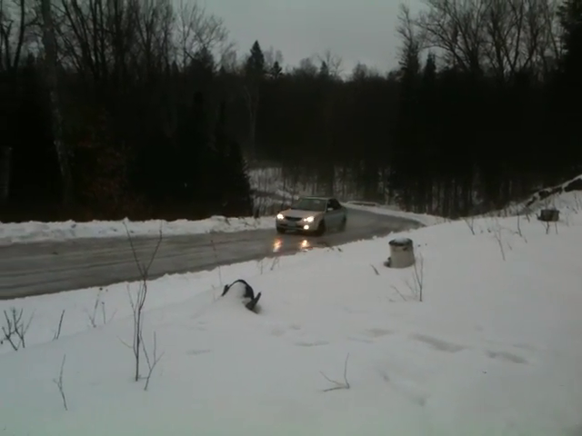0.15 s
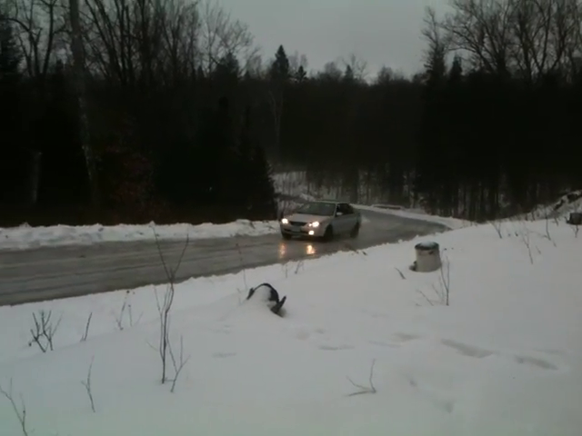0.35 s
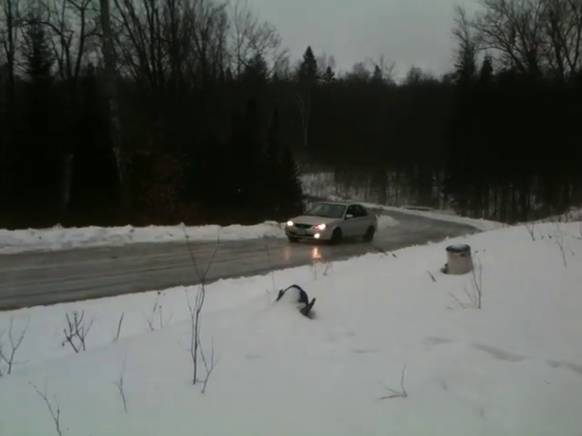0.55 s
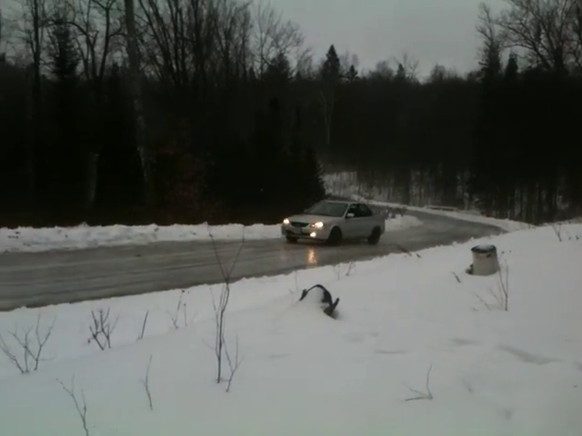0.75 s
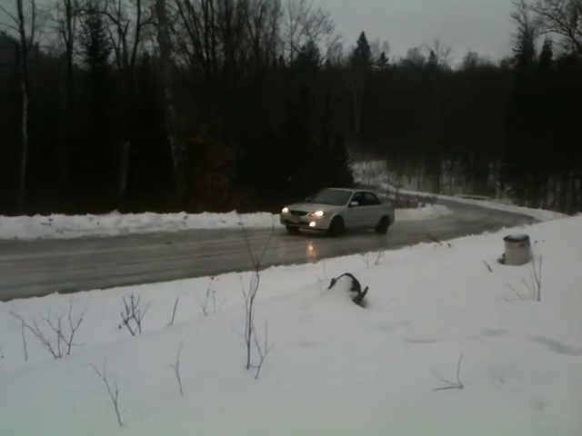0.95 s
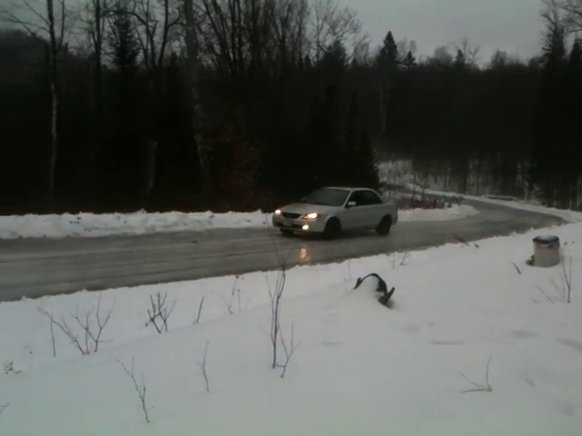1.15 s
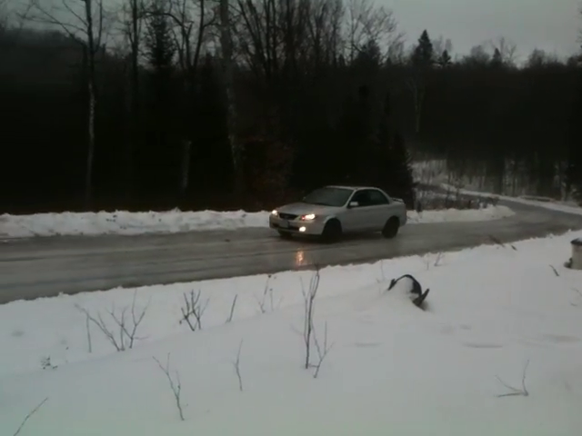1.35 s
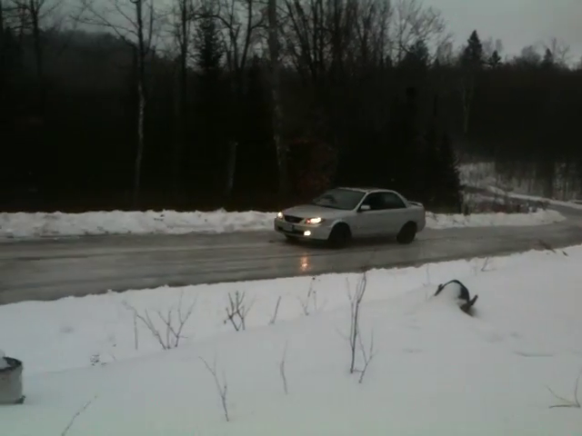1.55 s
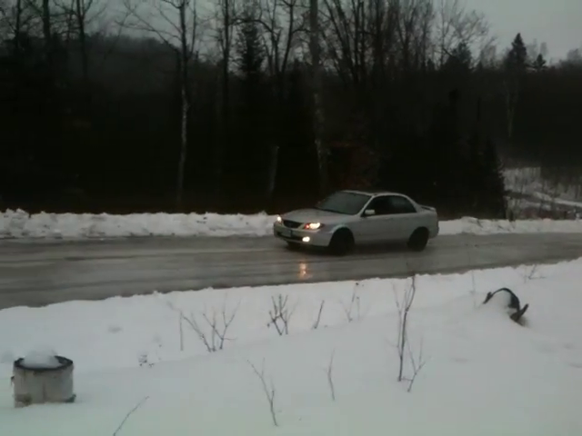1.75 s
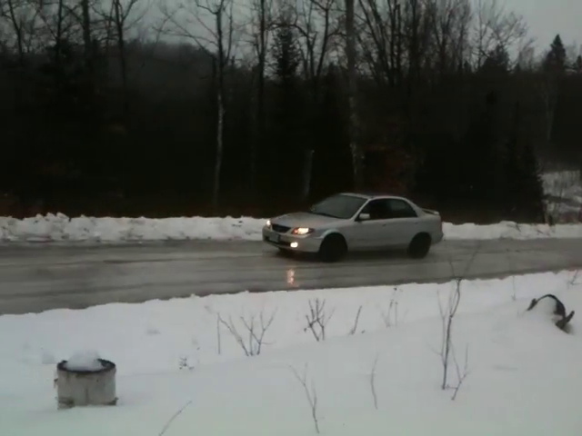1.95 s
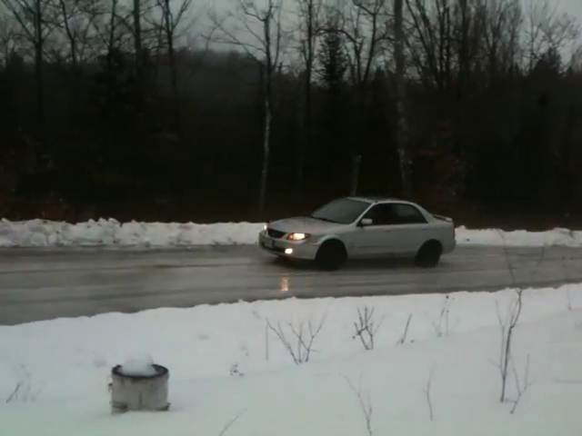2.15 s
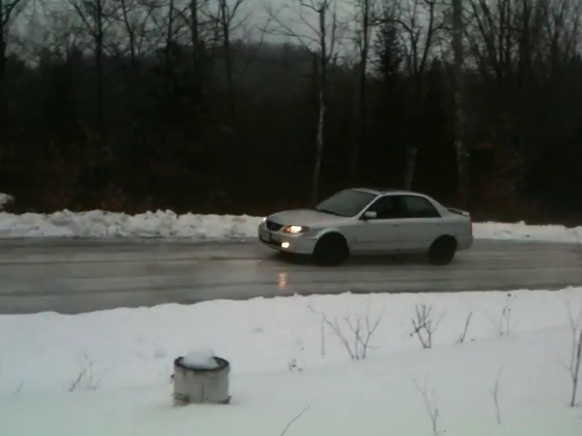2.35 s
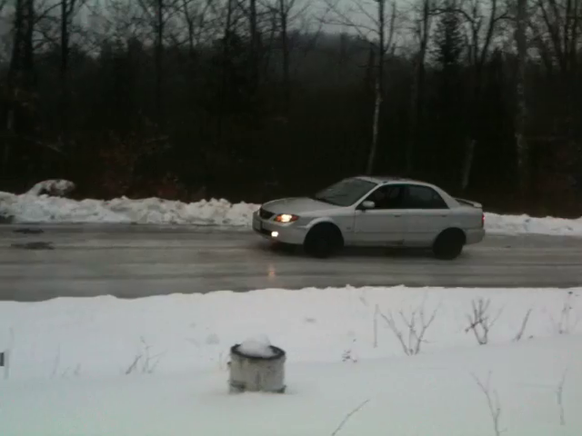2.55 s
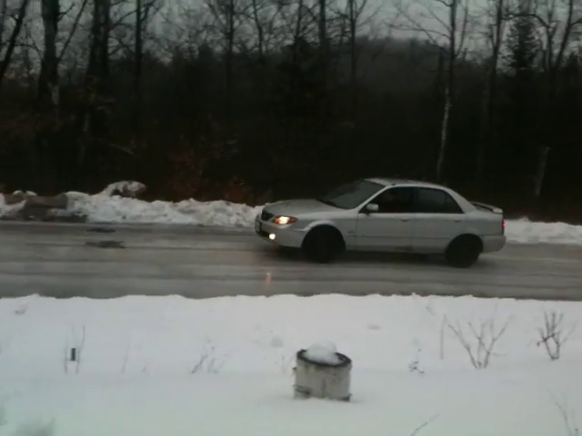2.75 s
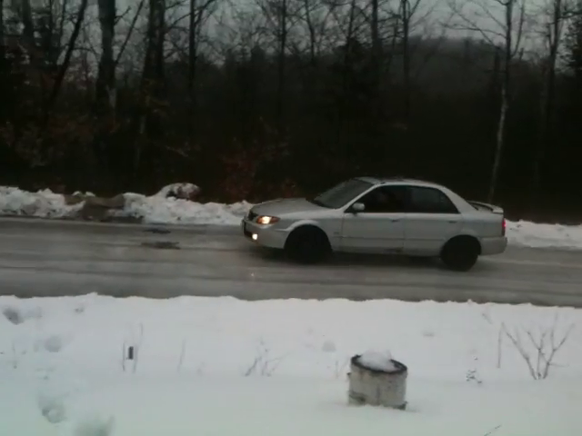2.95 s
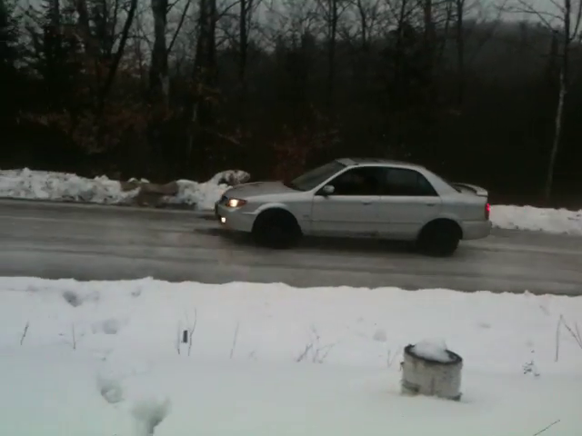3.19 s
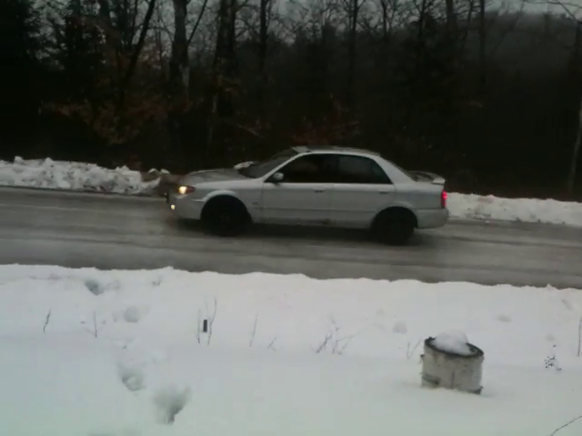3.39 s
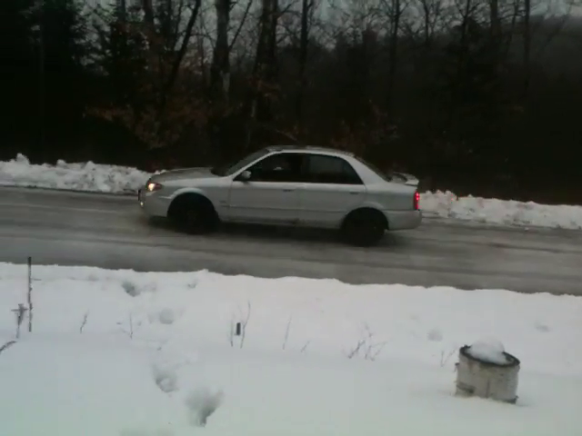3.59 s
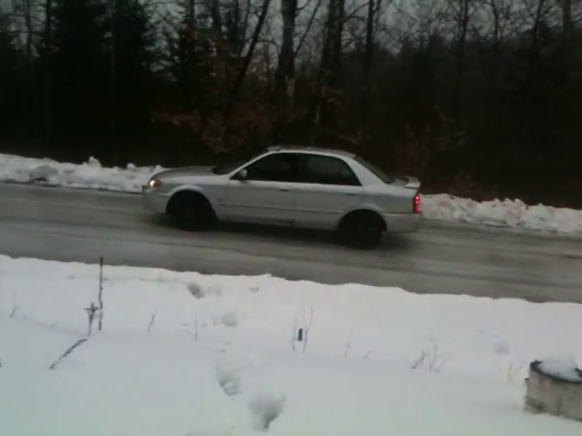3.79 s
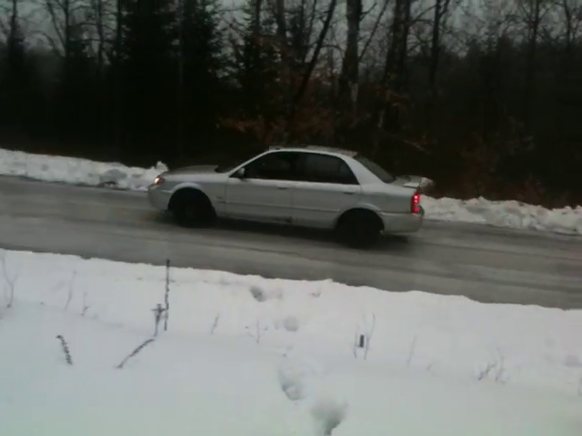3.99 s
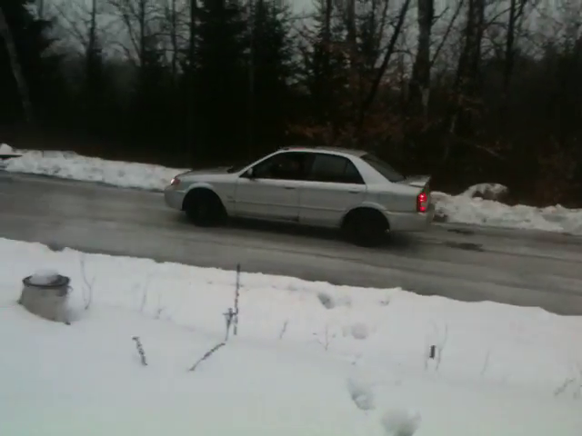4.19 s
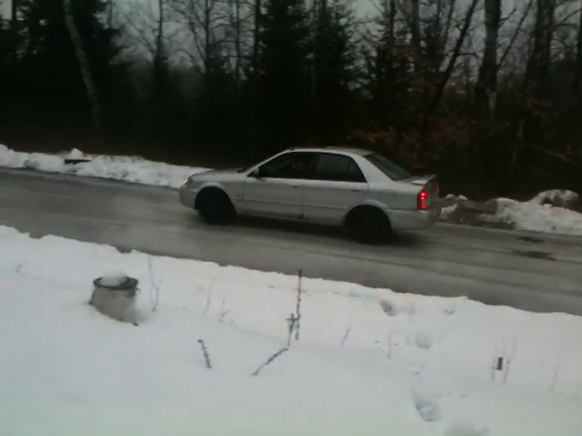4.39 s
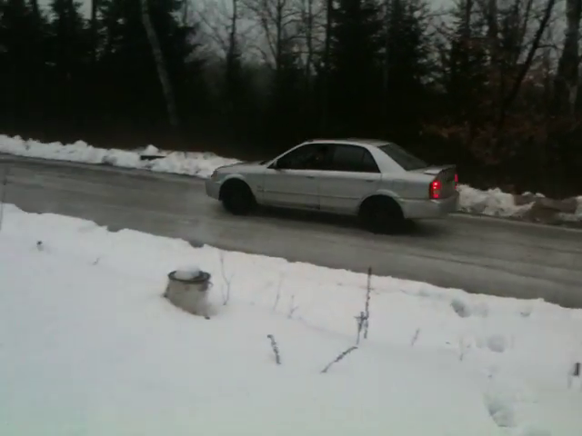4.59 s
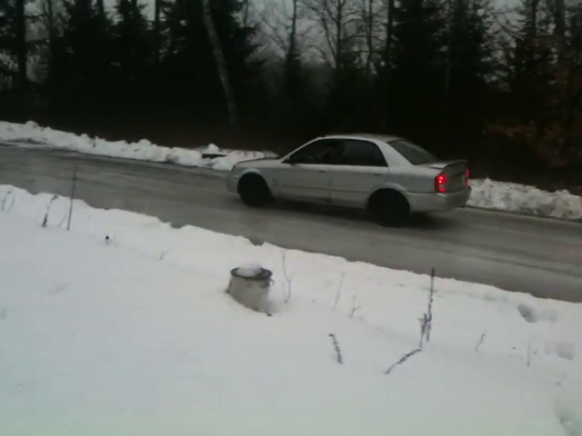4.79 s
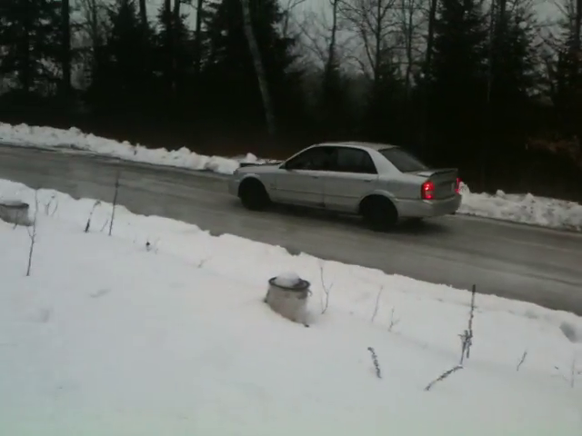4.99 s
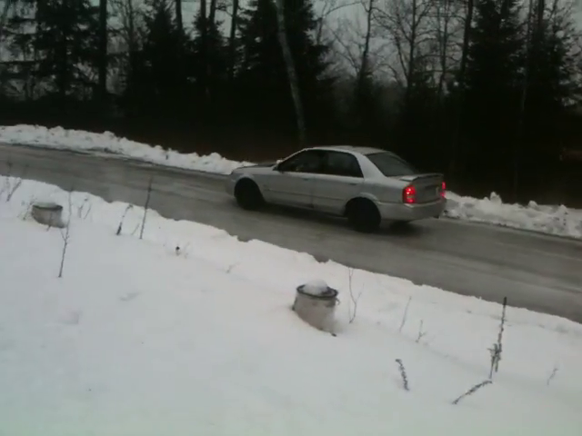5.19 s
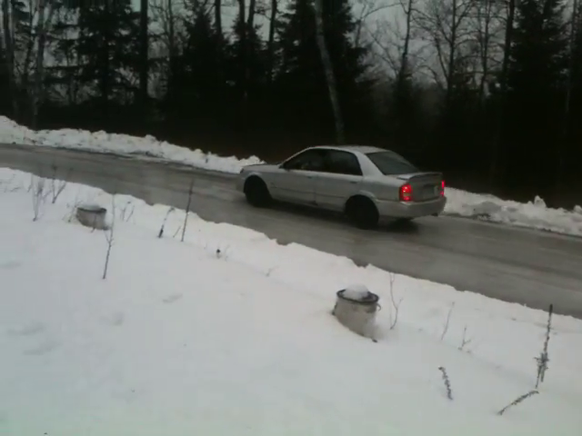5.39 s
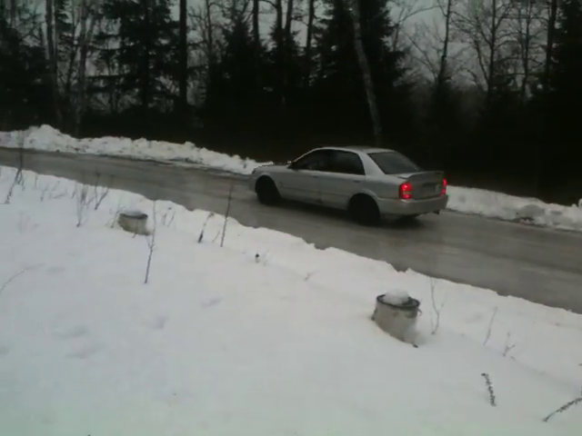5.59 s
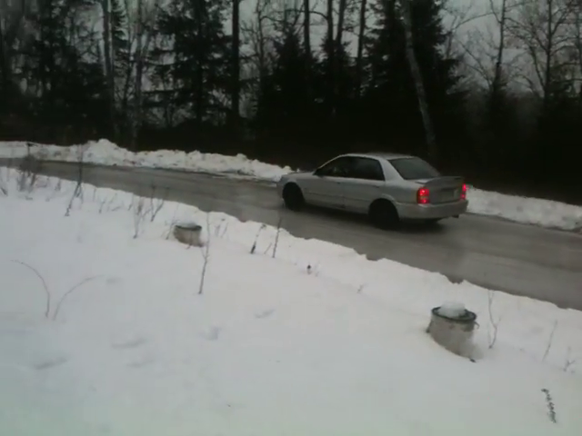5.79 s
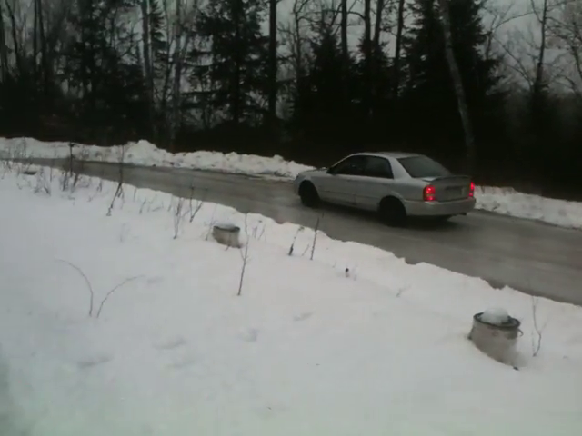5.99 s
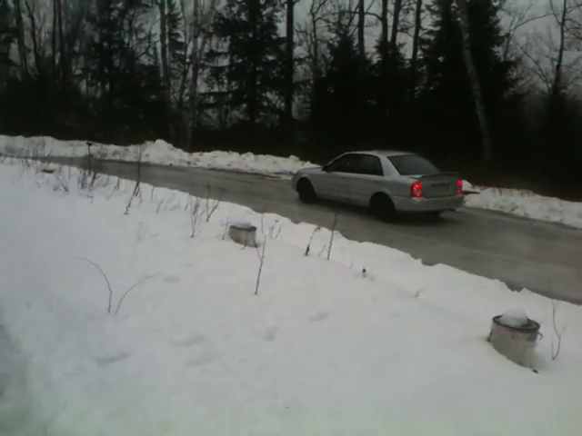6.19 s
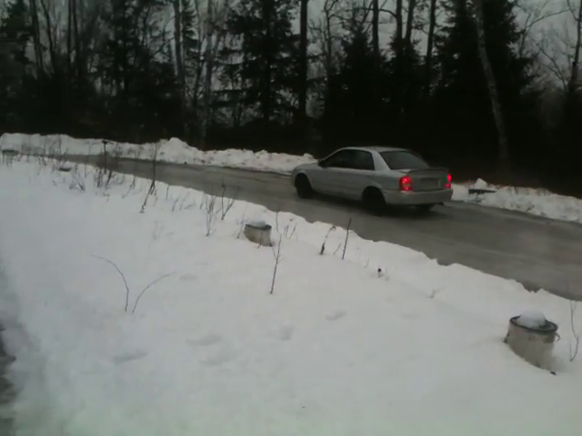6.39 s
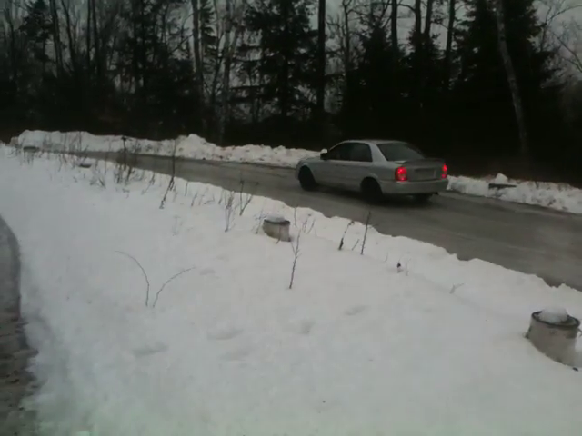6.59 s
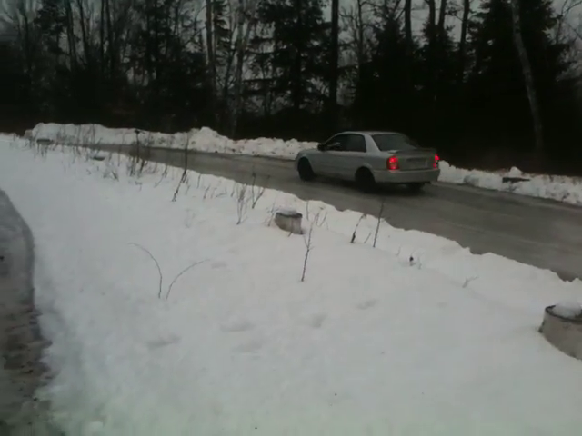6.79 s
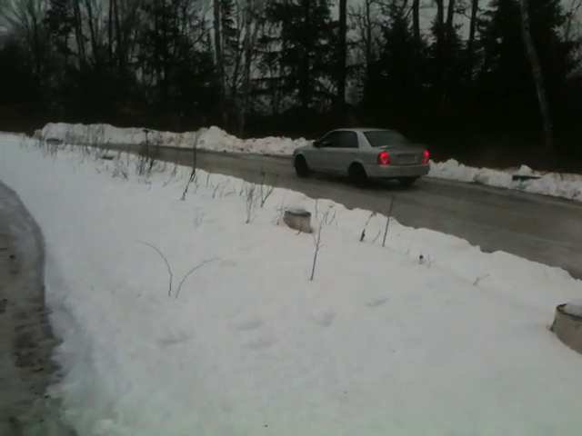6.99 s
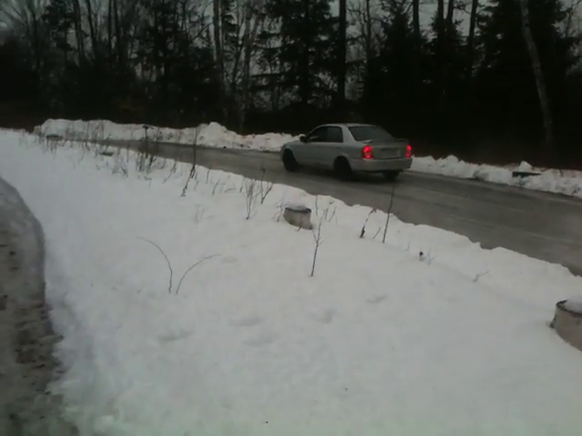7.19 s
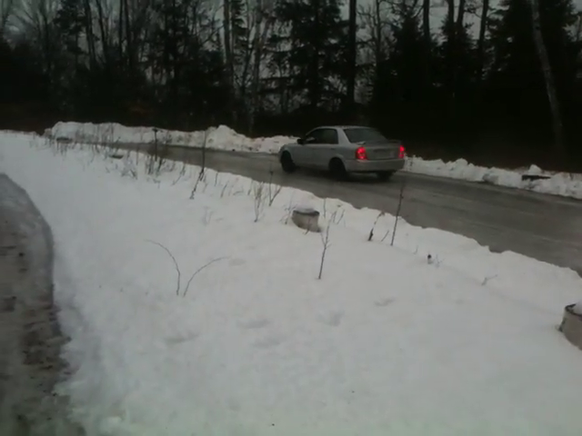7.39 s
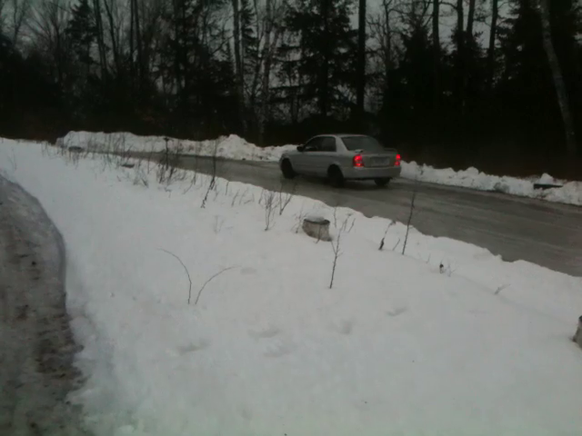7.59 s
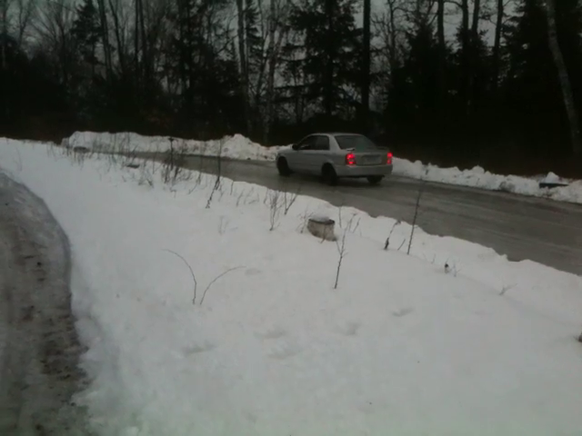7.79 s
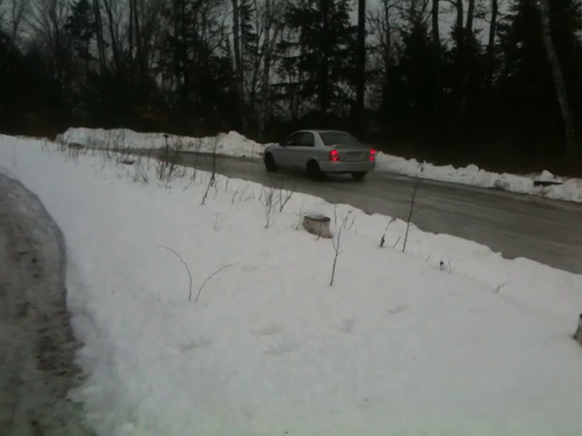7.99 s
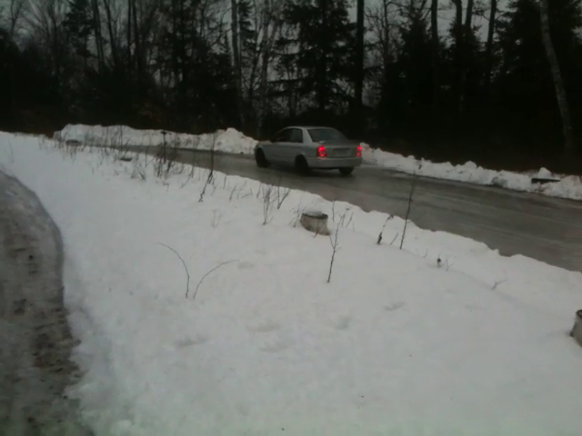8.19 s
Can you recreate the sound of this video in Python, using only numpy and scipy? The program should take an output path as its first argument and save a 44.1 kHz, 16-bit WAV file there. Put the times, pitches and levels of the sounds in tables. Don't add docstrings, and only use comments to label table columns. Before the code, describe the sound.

A small car passes on an icy, slushy road, its spinning tyres whining and howling unevenly over wet spray, with faint engine hum.

```python
import sys
import numpy as np
from scipy import signal
from scipy.fft import rfft, irfft, dct, next_fast_len
from scipy.io import wavfile
from scipy.ndimage import uniform_filter1d, map_coordinates

SR = 44100
rng = np.random.default_rng(int(sys.argv[2]) if len(sys.argv) > 2 else 0)


def gain_from_db(level_db):
    decades = np.asarray(level_db, float) / 20
    return 10 ** decades


def log_audio(samples):
    frames = np.atleast_2d(samples).T
    limited = np.clip(frames, -1, 1)
    pcm = np.round(limited * 32767).astype(np.int16)
    wavfile.write(sys.argv[1], SR, pcm)


N = 363825
TIME_S = np.arange(N) / SR


def unit(x):
    return x / np.sqrt(np.mean(x ** 2) + 1e-20)


def along(points, hz):
    f, v = np.transpose(points)
    return np.interp(np.log(hz + 1), np.log(f + 1), v)


def curves(rows):
    s, *cols = np.transpose(rows)
    return [np.interp(TIME_S, s, c) for c in cols]


def swells(rows, t):
    return sum(np.outer(db, np.exp(-((t - s) / half_s) ** 2)) for s, half_s, *db in rows)


def wobble(rate_hz):
    knots = rng.standard_normal(int(N * rate_hz / SR) + 4)
    return map_coordinates(knots, [np.arange(N) * rate_hz / SR])


def smooth_field(shape, bins, frames):
    field = uniform_filter1d(rng.standard_normal(shape), size=bins, axis=0)
    return unit(uniform_filter1d(field, size=frames, axis=1))


def coloured(x, spectrum):
    size = next_fast_len(N + 8192)
    gain = gain_from_db(along(spectrum, np.fft.rfftfreq(size, 1 / SR)))
    return irfft(rfft(x, size) * gain, size)[:N]


def rush(spectrum, patchy_db):
    z = signal.stft(rng.standard_normal(N), nperseg=512)[2]
    patches = gain_from_db(patchy_db * smooth_field(z.shape, 6, 8))
    noise = signal.istft(z * patches, nperseg=512)[1][:N]
    return unit(coloured(noise, spectrum))


PASS_S, CROSS_S = 3.83, 1.5


def behind(s):
    return np.arctan((s - PASS_S) / CROSS_S) * 2 / np.pi


# (time [s], tread block rate [Hz], tread singing over rubber [dB], lean onto shoulder and lugs [dB])
WHEEL_SPINS = [
    [(0, 2136, 3.5, -8), (.12, 2272, -4, -5), (.2, 2117, -1, -4), (.3, 1538, -12, 6)],
    [(1.2, 1434, -7.5, -5), (1.85, 2264, 1.5, -5), (2.0, 2173, 2, -6.5), (2.3, 2407, -4.5, 2.5),
     (2.8, 2640, 1.5, 0), (2.95, 2930, 3, 1.5), (3.15, 3101, 0.5, 4.5), (3.28, 2980, 0.5, 0),
     (3.56, 1141, -3, 0.5)],
    [(4.45, 1199, -19, -6), (5.0, 1595, -8, 5.5), (5.5, 1623, -5, 5), (5.75, 1778, 0, -0.5),
     (6.2, 1746, 3.5, -1.5), (6.57, 1645, 2.5, 2), (7.2, 1961, -4, 4.5), (7.3, 1943, -0.5, 0),
     (7.45, 1263, -15, -3)],
    [(8.25, 1540, -20, 5)],
]
ROLL_HZ, ROLL_DB, SPOOL_S, GRIP_S = 800.8, -31, .25, .14


def wheel():
    roll = (ROLL_HZ, ROLL_DB, 0)
    rows = []
    for spin in WHEEL_SPINS:
        loose_s, grip_s = spin[0][0] - SPOOL_S, spin[-1][0] + GRIP_S
        rows += [(loose_s, *roll), *spin, (grip_s, *roll)]
    return curves(rows)


# (time [s], slip force [dB], weight on carcass [dB], wetness [dB])
TYRE_CONTACT = [(0, -33.5, -2.5, -6), (.25, -29, -1.5, -10.5), (.48, -47, -0.5, -7.5), (.76, -42, -1, -5),
                (.92, -32, -4.5, -8.5), (1.3, -30.5, -10.5, -12.5), (1.86, -26, -5, -11),
                (2.14, -30, -4, -8.5), (2.62, -26, -1, -6.5), (3.15, -27, -6, -2.5), (3.5, -28, 0.5, -8.5),
                (3.58, -31, 3, -11.5), (4.02, -42.5, -1.5, -6.5), (5.05, -29.5, -8.5, -9),
                (6.55, -31, -12, -8), (7.24, -35.5, -9.5, -4.5), (7.65, -49, -10, -7), (8.25, -38, -4, -9)]
# (time [s], half length [s], carcass jolt [dB], rubber jolt [dB])
ICE_JOLTS = [(0.047, 0.024, -3.5, -3), (0.177, 0.033, 1.5, 3.5), (.8, 0.039, -3.5, 5), (1.16, .05, 3.5, 2),
             (1.81, 0.019, 6, -4.5), (2.48, .02, -1, -2), (2.56, 0.014, -15, 5), (2.6, 0.023, 3, -0.5),
             (2.71, 0.026, 5, -7), (2.762, .02, -11, 5), (2.817, 0.051, 0.5, -13), (7.47, 0.12, 3, 4.5),
             (2.943, 0.014, -3, -0.5), (2.963, 0.021, -0.5, -3), (3.008, 0.017, -21, 1.5),
             (3.052, .03, 4, -1), (3.179, 0.017, 5.5, 5), (3.211, 0.028, 9, -1.5), (3.92, 0.13, 5, 2),
             (3.371, 0.018, -8, 1.5), (3.415, .02, 7, 3), (4.3, 0.093, 1, 1), (5.071, 0.035, 6.5, -0.5),
             (5.349, .2, -2, -1), (5.931, 0.092, 5, -1.5), (6.108, 0.017, 9, 2.5), (6.31, .03, 4, 2),
             (6.412, 0.026, -0.5, 3.5), (6.701, 0.028, 5, 3.5), (6.88, 0.081, -1, -2.5)]
MIST_DB, MIST_FOLLOWS, SPRAY_JOLT = -44, 0.84, 0.34


def contact():
    slip_db, weight_db, wet_db = curves(TYRE_CONTACT)
    carcass_db, rubber_db = swells(ICE_JOLTS, TIME_S)
    drone_db = slip_db + weight_db + carcass_db
    scrub_db = slip_db + rubber_db
    spray_db = slip_db + wet_db + SPRAY_JOLT * (carcass_db / 2 + rubber_db)
    mist_db = MIST_DB + MIST_FOLLOWS * (spray_db + 39.5)
    return drone_db, scrub_db, spray_db, mist_db


def tread(orders, blocks):
    per_block, size = 16, 2 ** 19
    order = np.fft.rfftfreq(size, 1 / per_block)
    shape = sum(gain_from_db(db) ** 2 / width * np.exp(-((order - k) / width) ** 2) for k, width, db in orders)
    surface = irfft(rfft(rng.standard_normal(size)) * np.sqrt(shape), size)
    return map_coordinates(surface, [blocks * per_block], order=1, mode="wrap")


# (order of block rate [1], width [orders], level [dB])
TREAD_BLOCKS = [(0.994, .021, -6), (1.302, .09, -6), (1.678, .06, -1.5), (2, .06, -20)]
TREAD_SHOULDER = [(0.697, 0.059, -2.2)]
TREAD_LUGS = [(0.313, 0.034, -1), (0.494, 0.032, -4)]
# (frequency [Hz], gain [dB])
WHEEL_ARCH = [(150, -32), (400, -17), (550, -13.5), (750, -3.5), (1000, -1), (1800, 0.5), (2500, -5),
              (3100, -16.5), (3300, -22), (4100, -7), (4700, -4.5), (5600, -27), (7000, -24)]
WHINE_DB, HOWL_DB, GROWL_DB = (-0.5, 2), (1, -4.5), (-2.5, -5)
GROWL_DB_PER_KHZ = 2.5
EVEN_DB, EVEN_WANDER_RAD, FLUTTER_DB = (-8, 5), 1.7, 4


def tread_whine(drone_db, scrub_db):
    block_hz, sing_db, lean_db = wheel()
    rear = behind(TIME_S)
    whine_db, howl_db, growl_db = [sing_db + db + rear_db * rear for db, rear_db in (WHINE_DB, HOWL_DB, GROWL_DB)]
    howl_db = howl_db + lean_db
    growl_db = growl_db + lean_db + GROWL_DB_PER_KHZ * (block_hz / 1000 - 2)
    blocks = np.cumsum(block_hz) / SR
    voices = [(whine_db, TREAD_BLOCKS), (howl_db, TREAD_SHOULDER), (growl_db, TREAD_LUGS)]
    pattern = sum(gain_from_db(db + 1.45 * wobble(25)) * tread(orders, blocks) for db, orders in voices)
    even_db = whine_db + EVEN_DB[0] + EVEN_DB[1] * rear + FLUTTER_DB * wobble(22)
    even_phase = 2 * np.pi * TREAD_BLOCKS[0][0] * blocks + EVEN_WANDER_RAD * wobble(60)
    pattern = pattern + gain_from_db(even_db) * np.sin(even_phase)
    return coloured(gain_from_db((drone_db + scrub_db) / 2 + 3) * pattern, WHEEL_ARCH)


# (frequency [Hz], density [dB per Hz])
DRONE_SPECTRUM = [(330, -77), (420, -26.5), (520, -12.5), (720, -3), (980, -1), (1200, -1), (1500, -2.5),
                  (2200, -21.5), (3000, -26)]
SCRUB_SPECTRUM = [(600, -24.5), (1000, -22), (1300, -4), (1800, 2.5), (2300, -0.5), (2800, -8.5),
                  (3100, -11), (3300, -42)]
SPRAY_SPECTRUM = [(3000, -36), (3200, -9.5), (3600, -7), (4100, 2), (4400, -2.5), (4700, 0.5), (5000, -4.5),
                  (5600, -5.5), (6000, -10), (7000, -12), (9000, -35)]
MIST_SPECTRUM = [(5000, -25), (6500, -2), (7500, 0), (9500, -2), (10600, -6), (11500, -12), (12600, -9),
                 (13300, -10), (14000, -17), (14700, -15), (15500, -12)]


def tyres():
    drone_db, scrub_db, spray_db, mist_db = contact()
    whine = tread_whine(drone_db, scrub_db)
    stutter_db = 0.5 * wobble(14) + 0.71 * wobble(40) + 1.05 * wobble(150)
    rubber = gain_from_db(drone_db - 3.5) * rush(DRONE_SPECTRUM, patchy_db=2.0)
    rubber = rubber + gain_from_db(scrub_db - 8.5) * rush(SCRUB_SPECTRUM, patchy_db=-2.1)
    water = gain_from_db(spray_db - 1.17) * rush(SPRAY_SPECTRUM, patchy_db=1.3)
    water = water + gain_from_db(mist_db - 2.07) * rush(MIST_SPECTRUM, patchy_db=1.0)
    return gain_from_db(stutter_db) * (rubber + whine) + gain_from_db(0.31 * stutter_db) * water


# (time [s], firing rate [Hz], level [dB])
ENGINE_REVS = [(0, 70, -65.5), (.9, 72, -64.5), (1.3, 68, -62.5), (1.75, 77.5, -59.5), (2, 73.5, -60),
               (2.4, 77, -60), (2.75, 69, -59), (3.2, 82, -58.5), (3.42, 73.96, -63), (3.7, 66.1, -52),
               (3.95, 65.5, -57.5), (4.4, 60, -59), (5.4, 72, -61.5), (6, 76.5, -63.5), (6.7, 72, -64.5),
               (7.2, 75.15, -67), (7.7, 68.5, -70), (8.25, 69.7, -67.5)]
# (frequency [Hz], density [dB per Hz])
EXHAUST_SPECTRUM = [(25, -40), (50, -59), (80, -11.5), (140, -9), (230, 0.5), (300, -1.5), (400, -8),
                    (550, 1.5), (900, -36)]
# (dB over rumble, dB per 10 Hz above REV_HZ, dB gained from behind)
LOW_DB, HIGH_DB, REV_HZ = (-12.5, 8.5, 0), (-8.5, 2.5, -3), 72


def engine():
    firing_hz, level_db = curves(ENGINE_REVS)
    low_db, high_db = [db + rev_db * (firing_hz - REV_HZ) / 10 + rear_db * behind(TIME_S)
                       for db, rev_db, rear_db in (LOW_DB, HIGH_DB)]
    phase = 2 * np.pi * np.cumsum(firing_hz * (1 + .012 * wobble(12))) / SR
    low = gain_from_db(low_db + 1.7 * wobble(4.6)) * (.45 * np.sin(phase) + np.sin(2 * phase))
    high = gain_from_db(high_db + 1.7 * wobble(4.6)) * (0.3 * np.sin(3 * phase) + np.sin(4 * phase))
    rumble = gain_from_db(1.46 * wobble(12)) * rush(EXHAUST_SPECTRUM, patchy_db=-1.0)
    return gain_from_db(level_db + 2.3) * (low + high + rumble)


# (frequency [Hz], density [dB per Hz])
HISS_SPECTRUM = [(60, -39), (300, -2), (2000, -7.5), (8000, -8.5), (15000, -11.5)]


def microphone_hiss():
    return gain_from_db(-67.5) * rush(HISS_SPECTRUM, patchy_db=-8.0)


# (time [s], peak [dB], pitch [Hz])
FINGER_BUMPS = [(2.161, -37, 148.6), (2.349, -51, 117), (2.534, -59, 171.3), (2.761, -45, 151.5),
                (3.51, -46, 156.7), (4.429, -46, 187), (4.729, -42, 136.3), (4.833, -37, 124.2),
                (4.869, -47, 152), (4.956, -38, 117.9), (5.151, -43, 152.6), (5.591, -42, 123.7),
                (5.738, -48, 148.7), (5.878, -46, 123), (6.886, -58, 136.5), (7.964, -50, 118)]


def finger_bumps():
    out, t = np.zeros(N + SR), np.arange(SR // 20) / SR
    push = np.exp(-((t - .012) / 0.0053) ** 2)
    for s, db, hz in FINGER_BUMPS:
        out[round(s * SR):][:len(t)] += gain_from_db(db - 2.5) * np.sin(2 * np.pi * hz * t) * push
    return out[:N]


# (frequency [Hz], density [dB per Hz])
CASE_SPECTRUM = [(30, -40), (55, -13), (90, -2), (130, -2), (200, -40)]
SWING_S, SWING_HALF_S, SWING_DB = 4.42, .2, -64


def hand_swing():
    swing = np.exp(-((TIME_S - SWING_S) / SWING_HALF_S) ** 2)
    return gain_from_db(SWING_DB + 1.5 * wobble(15)) * swing * rush(CASE_SPECTRUM, patchy_db=-3.0)


def scene():
    mono = tyres() + engine() + microphone_hiss() + finger_bumps() + hand_swing()
    return np.array([mono, mono])


def bell(hz, centre_hz, width_hz):
    return np.exp(-((hz[:, None] - centre_hz) / width_hz) ** 2)


# (time [s], angle [0-1], treble shadow of the hand [dB])
PHONE_TURN = [(0, 0, -17), (.6, 0.1, -5), (1.1, 0.09, 1), (2, 0.08, -5), (2.4, 0.27, -4.5), (3.3, .65, 0),
              (3.52, 0.95, -3), (3.62, .85, -6.5), (4.1, .91, 2.5), (4.8, 1, 1.5), (6.3, 0.79, -3.5),
              (6.7, .99, -7), (7.3, 1.0, -5.5), (8.25, 1.0, -9)]
# (centre at angle 0 [Hz], shift over the whole turn [Hz])
BODY_DIPS = [(5300, 360), (10830, 1400), (13900, 350)]
FINGER_S, FINGER_DB, FINGER_LOW_DB, FINGER_TOP_DB = 6.5, -17, -5, -4.5
SEAM_HZ, SEAM_DB, SEAM_FILLS_DB, TREMOR_HZ = (3170, 55), -13, 15, 35


def phone_and_hand_db(hz, t):
    frame = np.minimum((t * SR).astype(int), N - 1)
    angle, shadow_db = [c[frame] for c in curves(PHONE_TURN)]
    low_hz, middle_hz, high_hz = [start_hz + moved_hz * angle for start_hz, moved_hz in BODY_DIPS]
    body_db = -7 * bell(hz, low_hz, 90) - 9.5 * bell(hz, middle_hz, 350) - 3.5 * bell(hz, high_hz, 550)
    seam_hz = SEAM_HZ[0] + SEAM_HZ[1] * behind(t) + TREMOR_HZ * wobble(11)[frame]
    seam_db = (SEAM_DB + SEAM_FILLS_DB * behind(t) ** 2) * bell(hz, seam_hz, 90)
    moved = (1 + np.tanh((t - FINGER_S) / 0.078)) / 2
    finger_db = (2.0 + FINGER_DB * moved) * bell(hz, 9700, 200)
    finger_db = finger_db + moved * (FINGER_LOW_DB * bell(hz, 1600, 130) + FINGER_TOP_DB * bell(hz, 15300, 700))
    return body_db + seam_db + finger_db + shadow_db * bell(hz, 14650, 4700)


# (time [s], half length [s], centre [Hz], level [dB])
BAND_SWELLS = [
    (1.05, 0.16, 1790, 6),
    (2.25, 0.081, 2110, 1.5),
    (3.155, 0.11, 1002, 4.5),
    (3.85, 0.22, 916, 4.5),
    (4.447, 0.35, 1880, 7.5),
    (5.05, 0.24, 2160, 5),
]
BOUNCE_HZ, BOUNCE_DB, RIDGE_DB, LIFT_DB = (1880, 380), (1, -0.5), (1, 2.5), (2, 4.5)


def road_bounce_db(hz, t):
    bounce_hz, bounce_db, ridge_db, lift_db = [mid + rear * behind(t)
                                               for mid, rear in (BOUNCE_HZ, BOUNCE_DB, RIDGE_DB, LIFT_DB)]
    bounce = bounce_db * bell(hz, bounce_hz, 190) + lift_db * bell(hz, 2600, 600)
    ridge = ridge_db * (bell(hz, 4750, 200) - bell(hz, 4100, 230))
    band_swells = sum(swells([(s, half_s, db)], t) * bell(hz, centre_hz, 190)
                  for s, half_s, centre_hz, db in BAND_SWELLS)
    return bounce + ridge + band_swells


def reflections_db(hz, shape):
    return 2.6 * smooth_field(shape, 4, 70) * np.clip(hz[:, None] / 9000, 0, 1)


# (frequency [Hz], step re neighbourhood level [dB])
LINE_STEP = [(1200, -40), (2700, -14), (3200, -6), (6000, -2.5), (9000, -.5), (10500, 3), (11500, 6.5),
             (13000, 6.5), (14000, 8.5)]
# (frequency [Hz], smallest step [dB])
LINE_FLOOR = [(2000, -95), (10000, -76), (13000, -65), (14000, -58), (15500, -57)]


def drop_faint_lines(x):
    hop, half = 1024, 512
    window = np.sin(np.pi * (np.arange(2 * hop) + .5) / (2 * hop))
    padded = np.pad(x, (hop, 2 * hop - N % hop))
    frames = np.lib.stride_tricks.sliding_window_view(padded, 2 * hop)[::hop] * window
    a, b, c, d = np.split(frames, 4, axis=1)
    lines = dct(np.hstack([-c[:, ::-1] - d, a - b[:, ::-1]]), type=4, norm="ortho")
    hz = (np.arange(hop) + .5) * SR / (2 * hop)
    power = uniform_filter1d(uniform_filter1d(lines ** 2, size=90, axis=1), size=3, axis=0)
    near = np.sqrt(np.abs(power))
    budget_db = 1.3 * rng.standard_normal((len(lines), 1))
    step = np.maximum(near * gain_from_db(along(LINE_STEP, hz) + budget_db), gain_from_db(along(LINE_FLOOR, hz)))
    kept = np.sign(lines) * np.floor(np.abs(lines) / step + .4) * step
    u = dct(kept, type=4, norm="ortho")
    p, q = u[:, :half], u[:, half:]
    blocks = np.hstack([q, -q[:, ::-1], -p[:, ::-1], -p]) * window
    return (blocks[1:, :hop] + blocks[:-1, hop:]).ravel()[:N]


def low_pass(x):
    return signal.sosfilt(signal.butter(12, 15670, fs=SR, output="sos"), x)


def record(dry):
    hz, t, z = signal.stft(dry[0], SR, nperseg=1024)
    gain_db = phone_and_hand_db(hz, t) + road_bounce_db(hz, t) + reflections_db(hz, z.shape)
    gain_db = gain_db - 22 * bell(hz, 0, 56)
    mono = drop_faint_lines(signal.istft(z * gain_from_db(gain_db), SR, nperseg=1024)[1][:N])
    return low_pass(np.array([mono, mono]))


dry = scene()
out = record(dry)
log_audio(out)
```